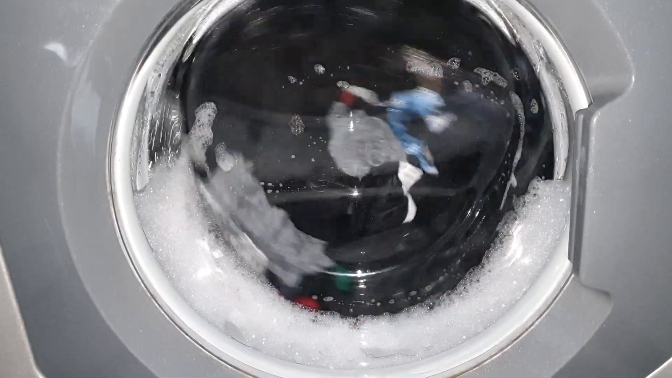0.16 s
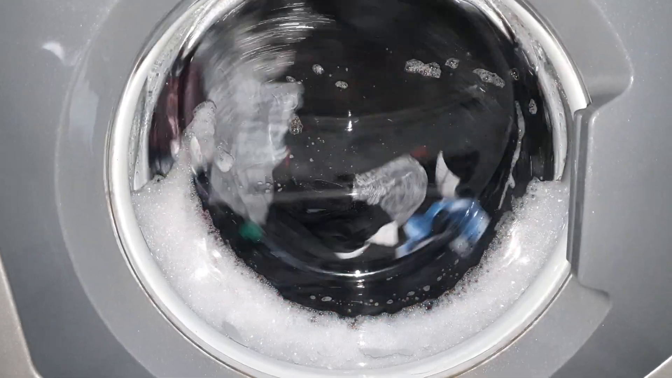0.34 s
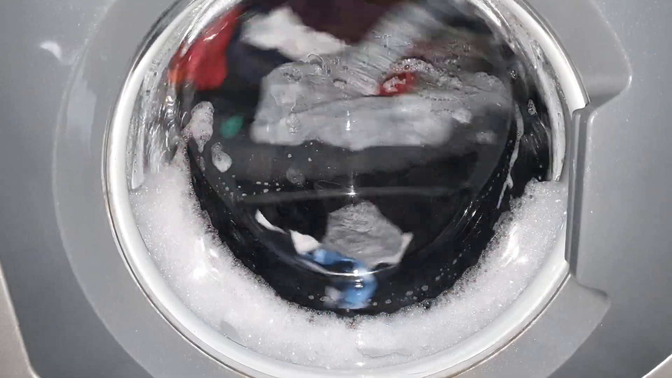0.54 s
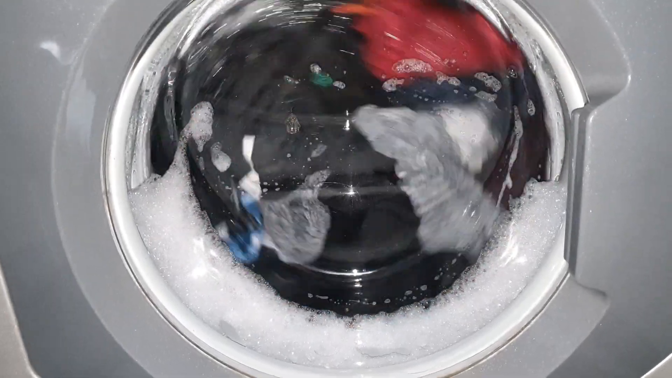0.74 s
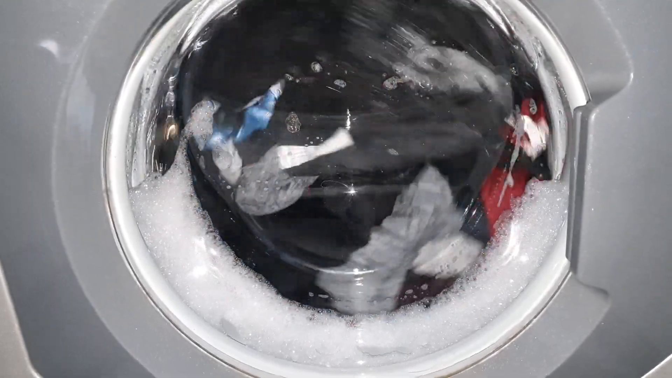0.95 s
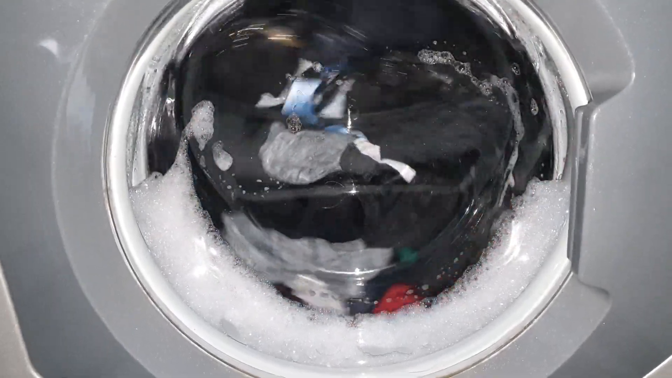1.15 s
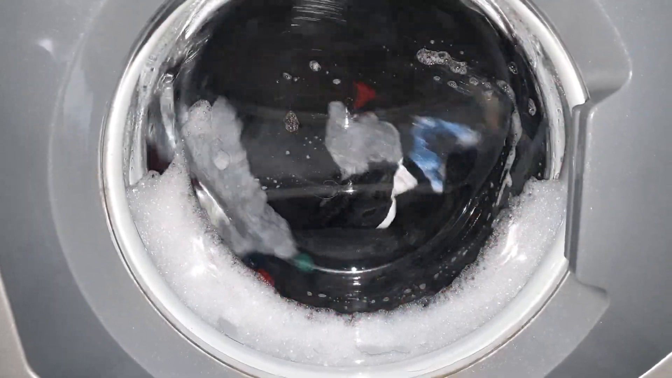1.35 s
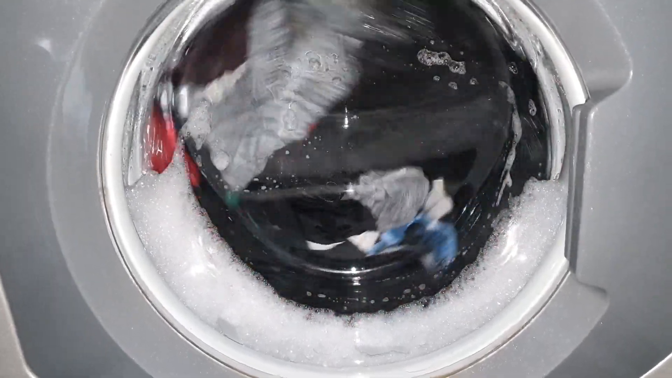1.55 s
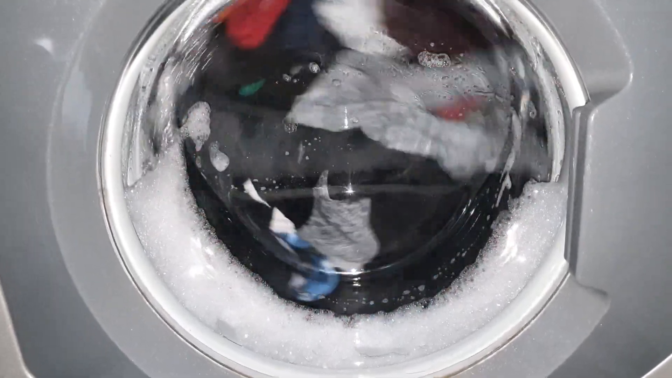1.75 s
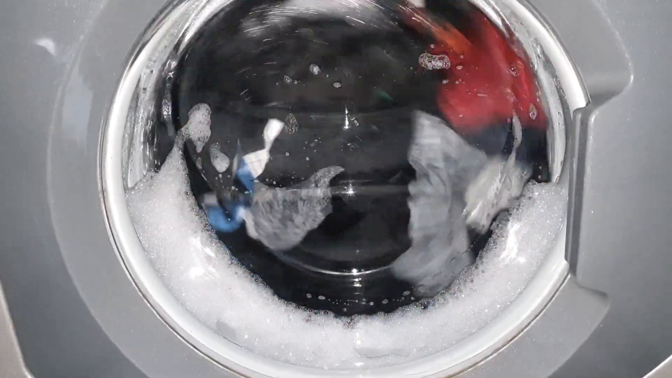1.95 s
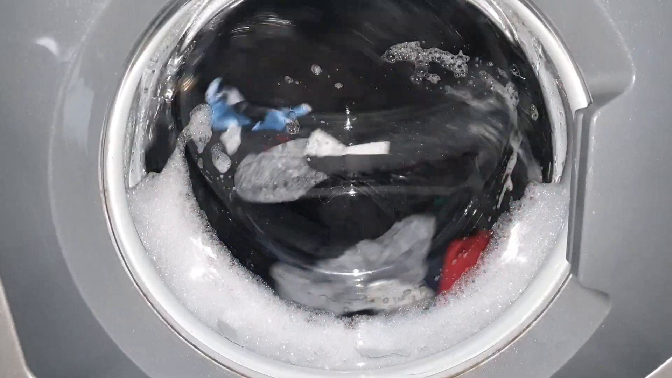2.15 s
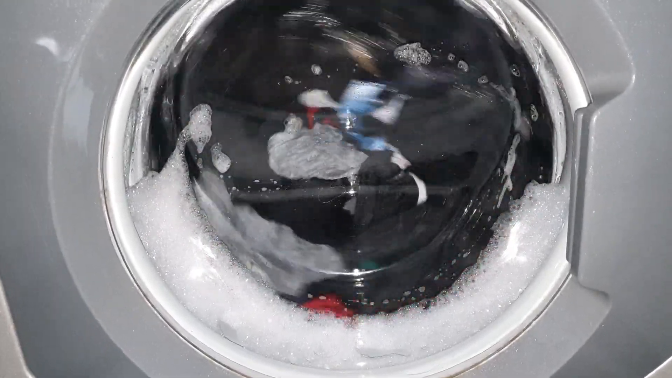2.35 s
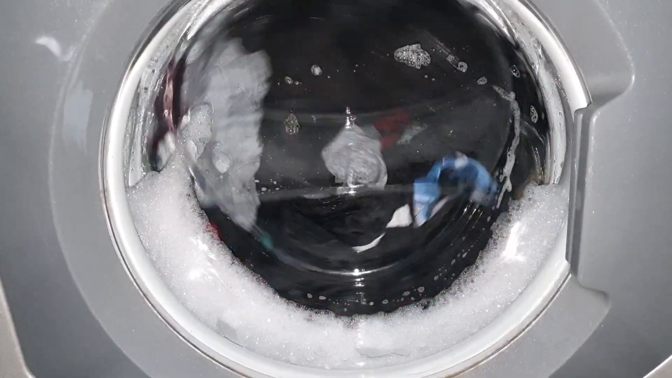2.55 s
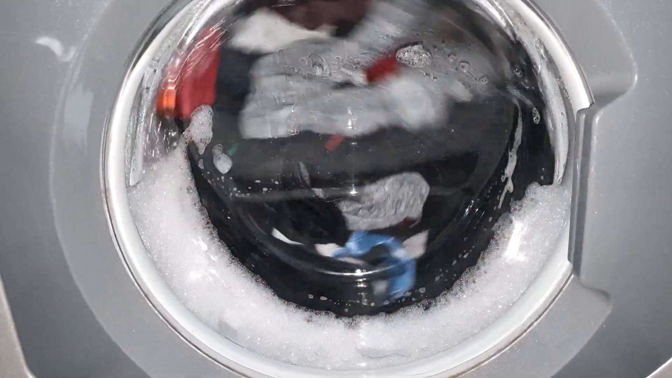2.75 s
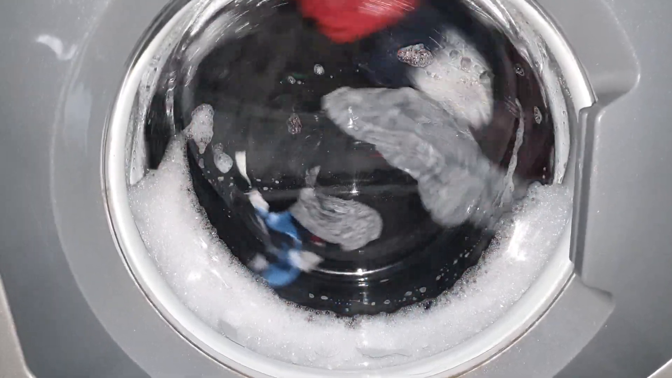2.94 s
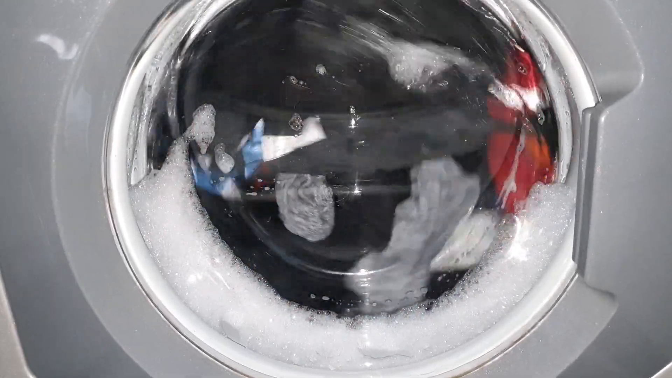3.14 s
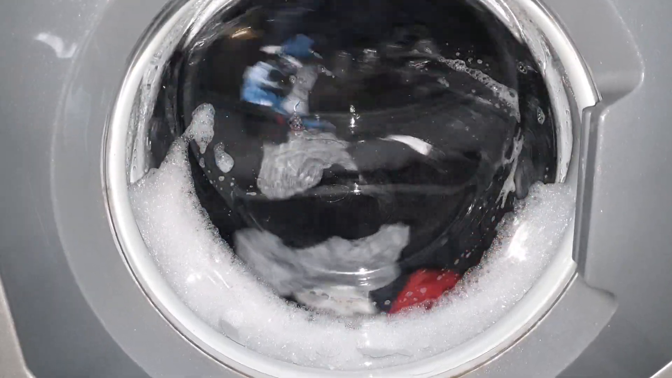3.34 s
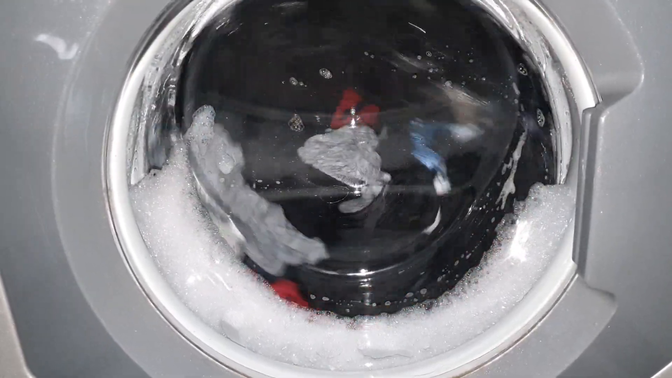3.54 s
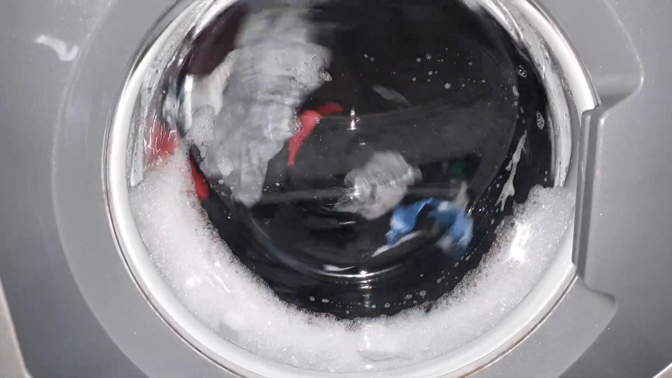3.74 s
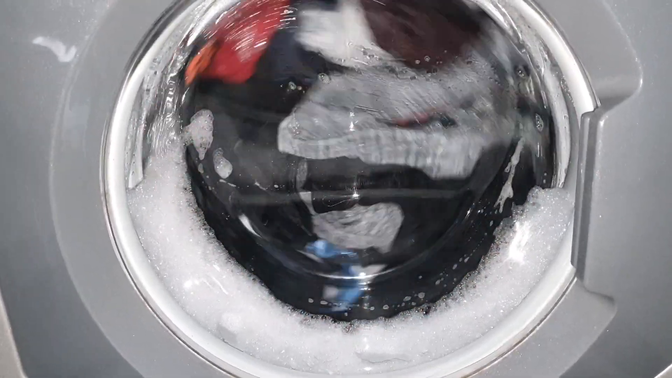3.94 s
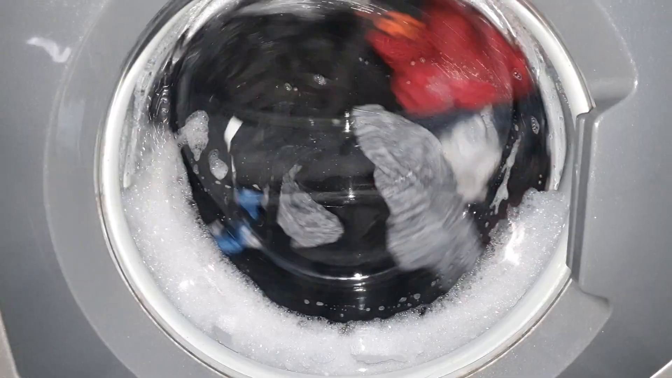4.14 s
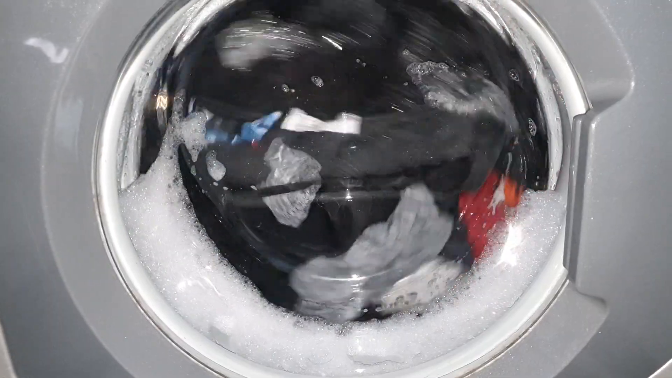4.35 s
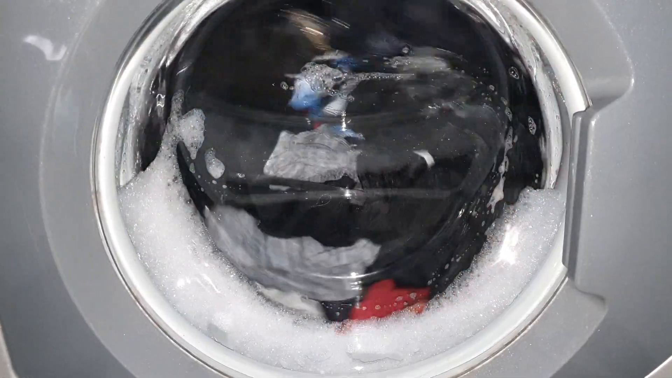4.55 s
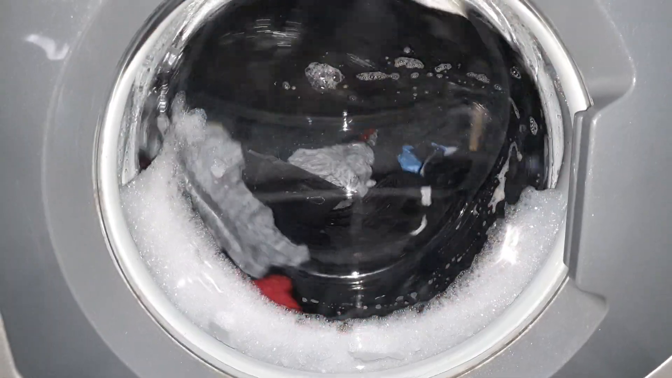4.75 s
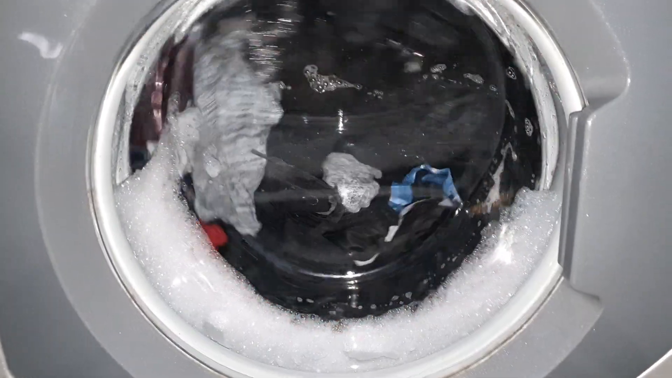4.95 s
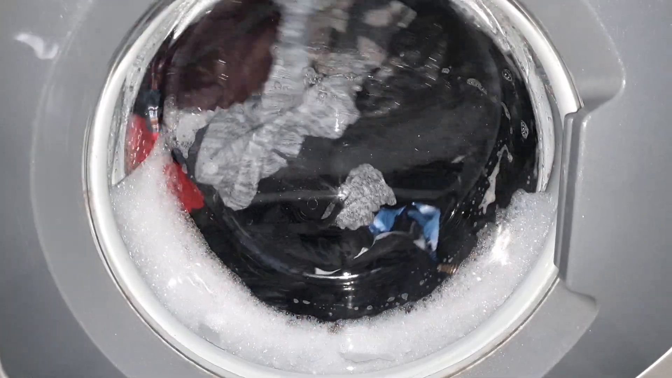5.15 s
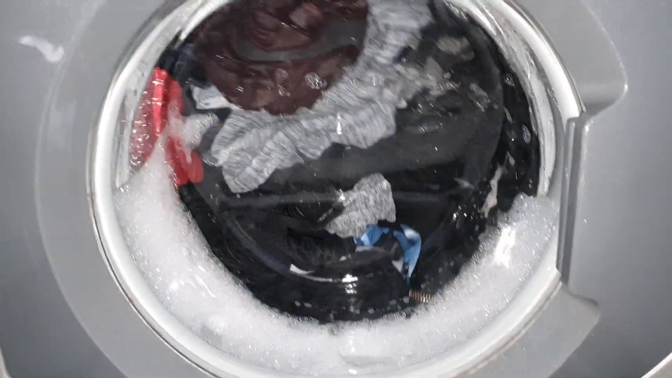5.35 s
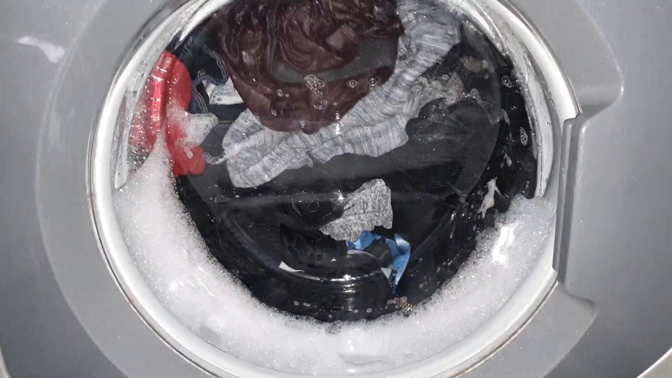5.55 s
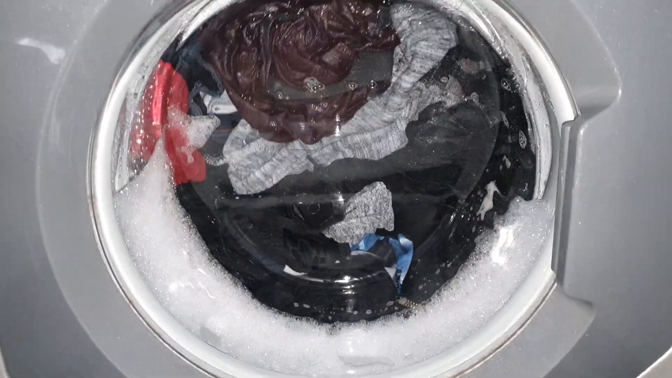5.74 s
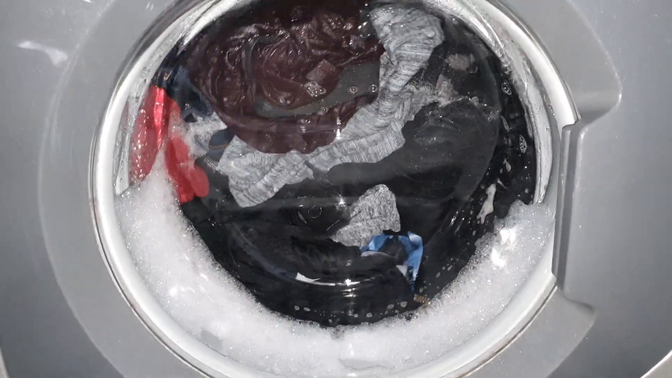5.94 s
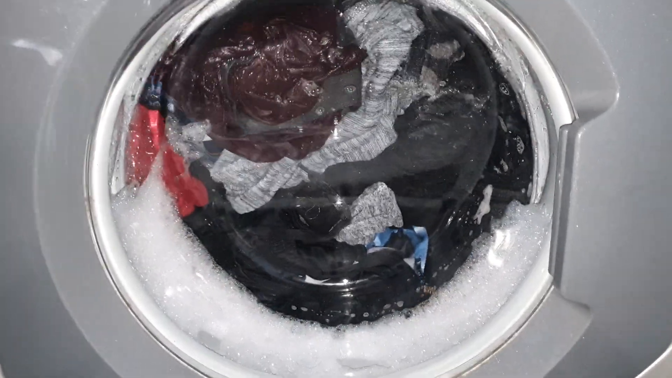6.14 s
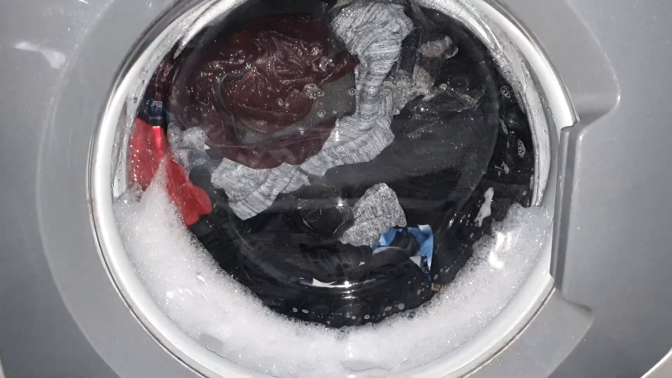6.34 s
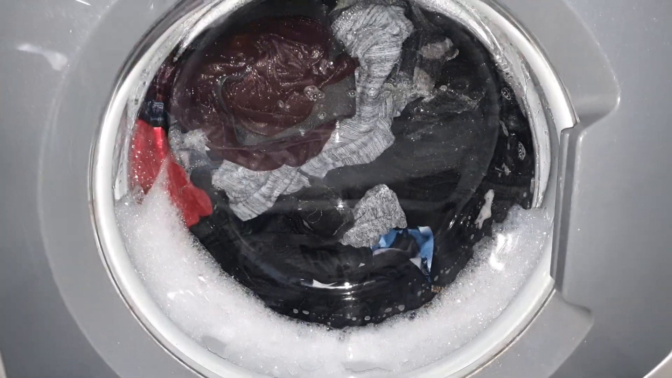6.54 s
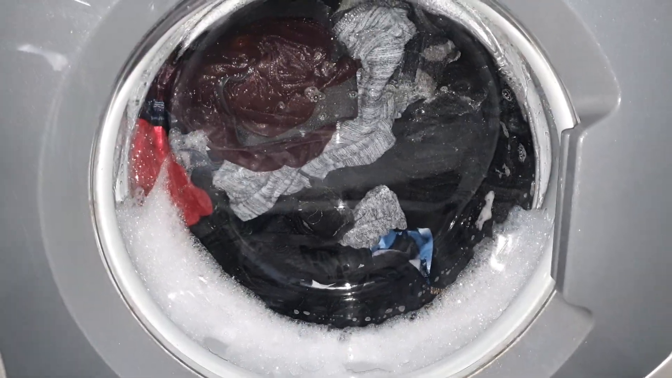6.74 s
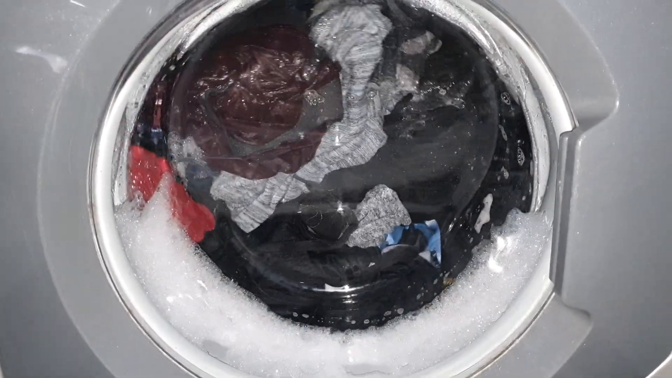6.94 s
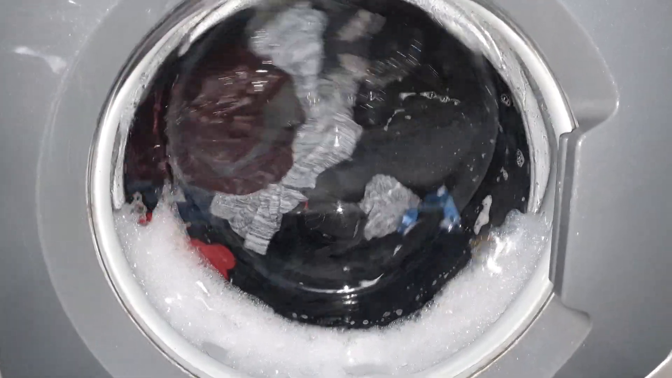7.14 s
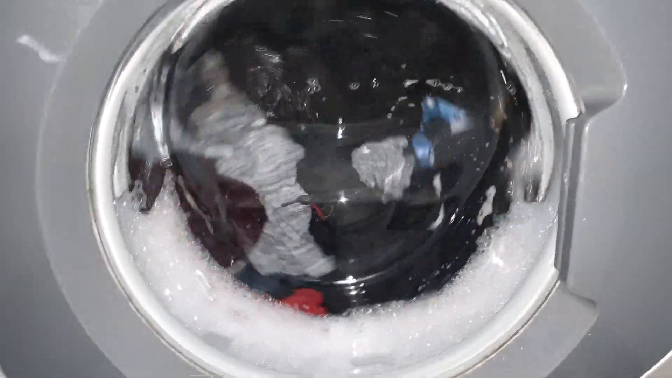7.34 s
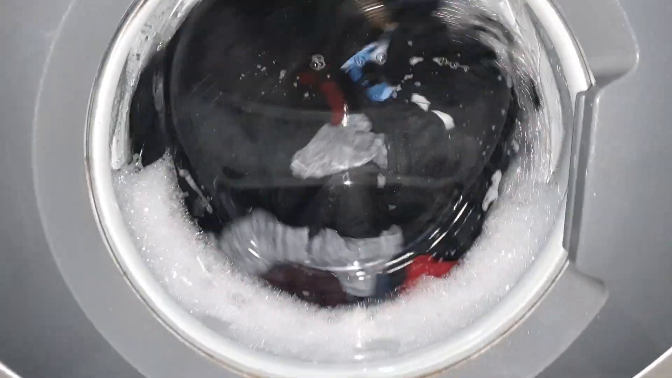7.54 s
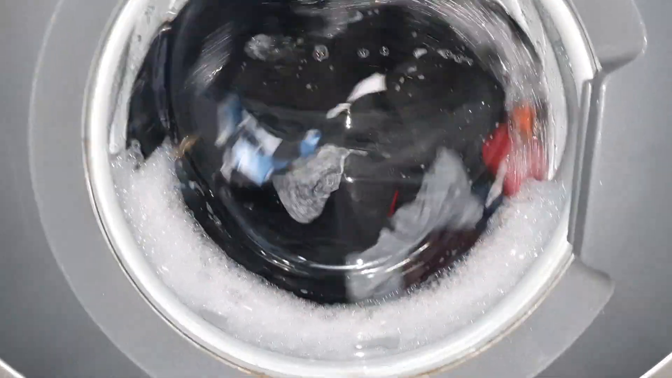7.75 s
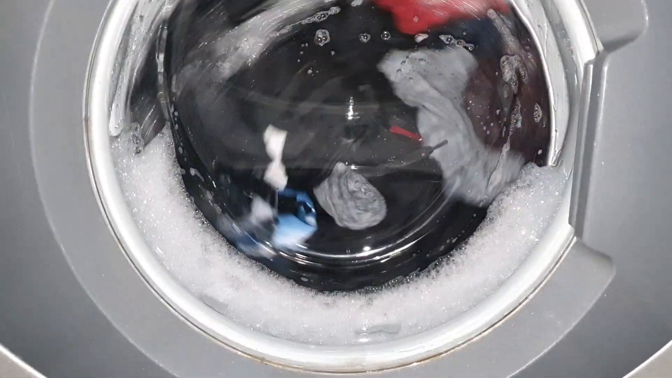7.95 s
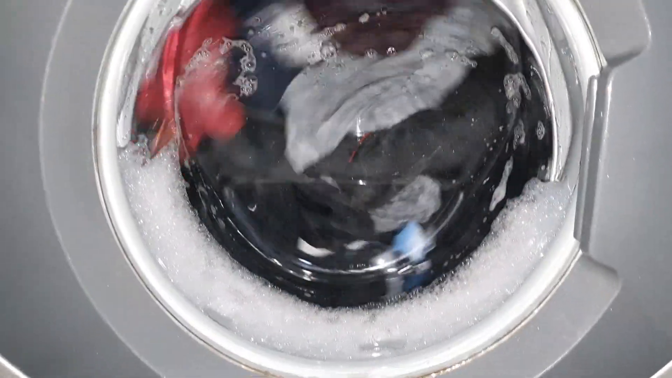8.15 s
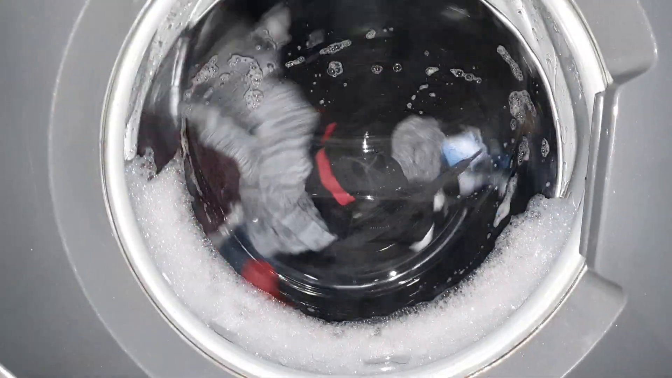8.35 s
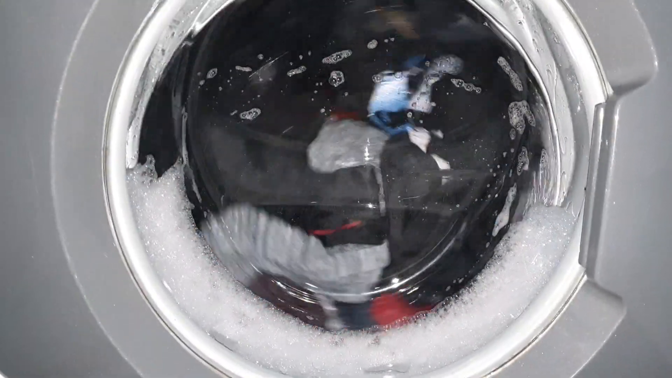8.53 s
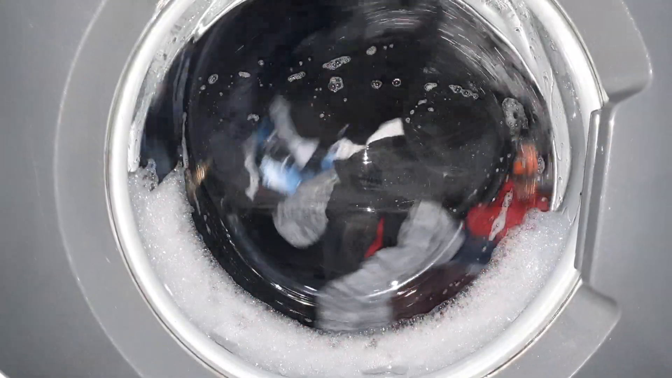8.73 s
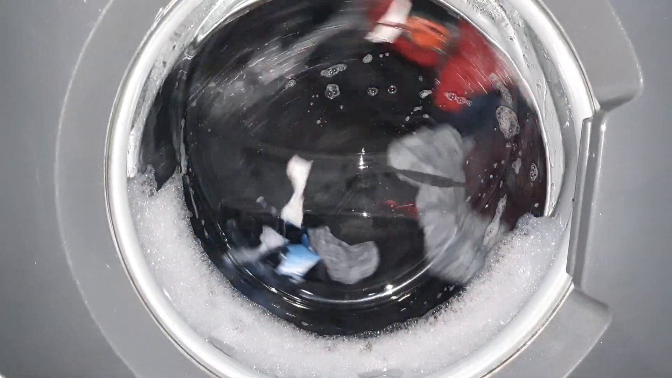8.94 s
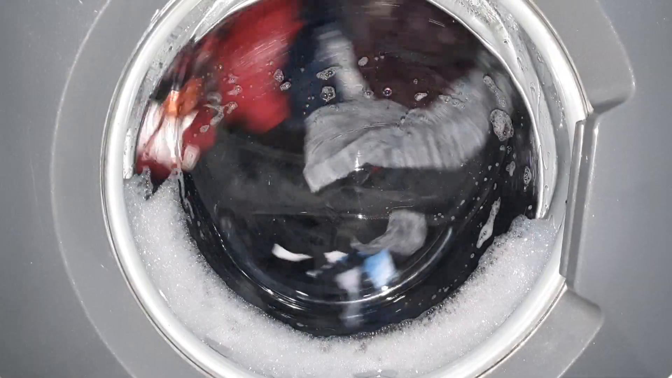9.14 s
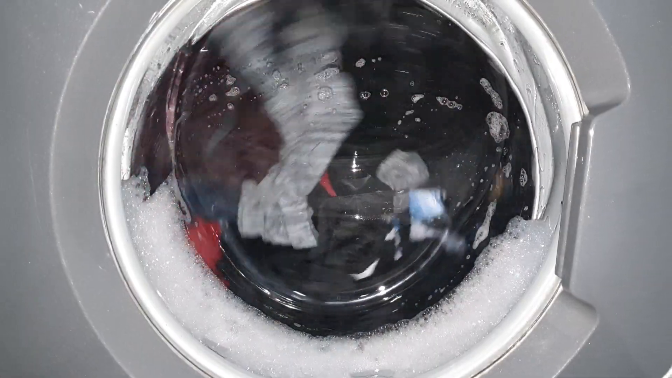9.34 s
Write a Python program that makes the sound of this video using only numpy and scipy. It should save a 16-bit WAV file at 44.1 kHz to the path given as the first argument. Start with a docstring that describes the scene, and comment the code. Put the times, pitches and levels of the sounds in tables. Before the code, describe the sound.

A washing machine drum tumbles soaked laundry with slaps, sloshing and small clicks, pauses on a pulsing mains hum, then jolts back into motion.

```python
"""Wet laundry slaps and thumps in a front-loading washing machine, heard near its door in a small room.
Slaps are noise bursts with droplet grains; thumps, churning water and suds are coloured noise; the drum's
jolts and the ticks of buttons or the machine itself ring modes. Two close sines make the slowly beating hum.
The drum stops near 4.5 s, the suds settle, and around two jolts the motor starts it the other way near 7 s."""
import sys
import numpy as np
from scipy import signal
from scipy.fft import rfft, irfft, next_fast_len
from scipy.io import wavfile
from scipy.ndimage import uniform_filter1d

SR = 44100
rng = np.random.default_rng(int(sys.argv[2]) if len(sys.argv) > 2 else 0)


def store_wav(level_fs):
    """Save 16-bit WAV to argv[1]."""
    pcm = np.round(np.clip(np.atleast_2d(level_fs), -1, 1) * 32767)
    wavfile.write(sys.argv[1], SR, pcm.T.astype(np.int16))


N = 414099
TIME = np.arange(N) / SR

# wet cloth falling in the drum; the faint hit at 3.692 may be a tick on the door:
# start_s, slap_db (nominal peak), thump_db (peak)
FALLS = [(.125, -45.5, -44), (.448, -45, -42.5), (.776, -48.5, -60), (1.261, -47, -50),
         (1.659, -53.5, -46.5), (1.845, -55, -37), (1.992, -54, -52), (2.152, -43.5, -39.5),
         (2.482, -43, -34.5), (2.931, -43, -31), (3.057, -51, -44.5), (3.287, -42.5, -33.5),
         (3.348, -48, -71), (3.692, -53, -64), (4.090, -42.5, -29.5), (4.255, -55, -39), (4.403, -54, -40),
         (4.430, -49, -51), (4.825, -56, -38), (7.335, -55.5, -47), (7.582, -41.5, -59),
         (7.775, -44.5, -40.5), (7.815, -55.5, -52), (7.958, -44, -39), (8.06, -49.5, -52),
         (8.628, -46.5, -35), (9.113, -53.5, -56), (9.258, -61, -49), (9.335, -55, -55)]
# one run of the drum each way: power_on_s, power_off_s
POWER = [(-2, 4.48), (6.95, 10)]
# level of each run: brush_db (relative), rumble_db, churn_db, suds_db (before the swish)
RUNS = [(-4, -62.5, -57.5, -73), (-10, -62, -56.5, -70)]
SPIN_UP_S, COAST_S = 0.15, 0.23  # linear rise, exponential fade
BREAK_LOOSE_S, LOOSEN_S = 0.315, 0.06  # the drum turns a little before the load gives way


def slaps(hard_rise_s=0.000099, hard_db=-42, hold_s=0.0048, smack_t60_s=0.18,
          wash_rise_s=0.014, wash_t60_s=0.35, wash_db=-6, crest_db=20.5):
    """Wet cloth hits with a smack of droplets, then a duller wash; light falls land more softly."""
    # spray: freq_hz, level_db
    spray_colour = [(300, -12.5), (1100, 7), (1580, -3), (2050, 4.5), (3150, 4.8), (3800, -1.5), (4700, -5),
                    (6700, -6.5), (7500, -12.5), (10000, -9.5), (16000, -24)]
    out, t = np.zeros((2, N)), np.arange(SR // 2) / SR
    for start_s, db, _ in FALLS:
        rise_s = hard_rise_s * undb(hard_db - db)
        smack = 1.1 * (grains(len(t), 3000, scatter_db=2.1) + noise(len(t)))
        smack *= (1 - np.exp(-t / rise_s)) * undb(-60 * np.maximum(t - hold_s, 0) / smack_t60_s)
        wash_rise = 1 - np.exp(-t / wash_rise_s)
        wash = colour(noise(len(t)), [(3000, 10.0), (4500, -2.0), (8000, 2.5)])
        wash *= wash_rise * undb(wash_db - 60 * t / wash_t60_s)
        ragged = undb(2.7 * walk(95)[:len(t)] * wash_rise)  # the water runs off in spurts
        slap = unit(spread(colour((smack + wash) * ragged, spray_colour)))
        add(out, start_s, slap * undb(db - crest_db))
    return cavity(out)


def thumps(lag_s=0.015, swell_s=0.02, tail_s=0.097):
    """The bundle's weight lands after its wet edge: a swelling noise burst that booms in the tub."""
    # tub: freq_hz, level_db
    tub_colour = [(60, -19.5), (210, -11.5), (255, -0.5), (285, 1), (315, -12), (345, -4.5), (420, -24.5),
                  (600, -23.5), (8000, -75)]
    out, t = np.zeros((2, N)), np.arange(SR // 2) / SR
    for start_s, _, db in FALLS:
        envelope = t / swell_s * np.exp(-t / swell_s) + 0.2 * np.exp(-t / tail_s)
        blow = spread(colour(noise(len(t)) * envelope, tub_colour))
        add(out, start_s + lag_s, peak(blow, db))
    return from_right(out)


def water(surge_db=5, surge_s=1, swish_db=2.6, gurgle_db=-71.5):
    """Water churns, gurgles low behind the door, and the suds swish; each fall stirs them up."""
    # churning water: freq_hz, level_db
    churn_colour = [(25, -7.5), (175, -2), (205, -6.5), (280, 4), (420, -8.5), (560, -3), (760, -12),
                    (1130, -16), (1500, -35.5), (8000, -68.5)]
    # suds: freq_hz, level_db
    suds_colour = [(600, -8), (1100, 1), (1500, -3), (2800, 1), (3900, -4), (6800, -11), (7500, -21),
                   (9600, -16), (11500, -25), (16000, -31)]
    # gurgle: freq_hz, level_db
    gurgle_colour = [(500, -12), (1100, 0), (2200, -7), (4500, -26)]
    churn = unit(spread(colour(noise(), churn_colour))) * undb(2 * walk(22))
    fizz = noise() + 1.8 * splashes() * grains(N, 4000, scatter_db=2)
    foam = unit(cavity(spread(colour(fizz, suds_colour))))
    lapping = noise() * splashes(rate=11)  # small waves slap the drum
    gurgle = unit(cavity(spread(colour(lapping, gurgle_colour)))) * undb(gurgle_db)
    out, swish = 0, walk(16)
    for (on_s, off_s), (_, _, churn_db, suds_db) in zip(POWER, RUNS):
        # the first turn drags the soaked load through the suds: louder and more even
        drag = np.exp(-np.maximum(TIME - on_s - BREAK_LOOSE_S, 0) / surge_s)
        suds = foam * undb(suds_db + surge_db * drag + swish_db * swish * (1 - drag))
        out = out + stirring(on_s, off_s) * (churn * undb(churn_db) + gurgle + suds)
    return out


def strokes(rise_s=0.0022, fade_s=0.037):
    """A fold of sudsy cloth wipes the foam on the door glass: a short, bright fizz."""
    # wipes: start_s, level_db (rms before the envelope)
    wipes = [(0.299, -70), (1.452, -71), (1.815, -69.5), (1.965, -65.5), (2.629, -69), (3.101, -64.5),
             (3.133, -68), (3.91, -68), (7.275, -69), (7.924, -66)]
    # fizz: freq_hz, level_db
    stroke_colour = [(2000, -19), (5000, -1), (6700, 3), (7500, -1), (10000, 0.5), (14500, -22)]
    out, t = np.zeros((2, N)), np.arange(SR // 5) / SR
    for start_s, db in wipes:
        droplets = noise(len(t)) + 0.82 * grains(len(t), 3000, scatter_db=3)
        fizz = unit(colour(droplets, stroke_colour))
        add(out, start_s, fizz * (1 - np.exp(-t / rise_s)) * np.exp(-t / fade_s) * undb(db))
    return cavity(out)


def gulps(count=60, length_s=0.045, scatter=0.24, fade_s=0.0016, rise_per_s=3):
    """Air gulps out from under the cloth as a froth of short-lived bubbles, each rising in pitch."""
    # air pockets: start_s, level_db (nominal peak), pitch_hz
    pockets = [(.915, -54, 1010), (1.124, -49, 1180), (2.255, -50, 1030), (3.06, -49, 1050),
               (4.257, -45.5, 1080), (4.404, -42.5, 940), (7.333, -47, 1090), (7.96, -44, 910)]
    out, t = np.zeros((2, N)), np.arange(SR // 20) / SR
    for start_s, db, hz in pockets:
        froth = np.zeros((2, SR // 2))
        for _ in range(count):
            bubble_hz = hz * np.exp(scatter * rng.standard_normal())
            phase = 2 * np.pi * bubble_hz * t * (1 + rise_per_s * t / 2) + rng.random((2, 1))
            ping = np.sin(phase) * np.exp(-t / fade_s)
            add(froth, length_s * rng.random(), ping * rng.random())
        add(out, start_s, peak(froth, db + 0.5))
    return cavity(out * undb([[2], [-2]]))


def squelch():
    """The settling load squeezes air through the foam: a swelling hiss, pitched by its escape gap."""
    # squeezes: crest_s, level_db, hiss_db, gap_hz, gap_t60_s, swell_s, fade_s
    squeezes = [(4.458, -56.5, -11, 4140, 0.0029, 0.0064, 0.072),
                (5.404, -57.5, 1, 3500, 0.011, 0.04, 0.011)]
    # hiss: freq_hz, level_db
    hiss_colour = [(1300, -3), (2800, -18), (4500, -15), (7500, -14), (12500, -10), (14500, -35)]
    out, hiss = 0, unit(colour(noise(), hiss_colour))
    for crest_s, db, hiss_db, gap_hz, gap_t60_s, swell_s, fade_s in squeezes:
        gap = unit(resonate(noise(), [(gap_hz, 0, gap_t60_s)]))
        envelope = np.exp(-np.maximum((crest_s - TIME) / swell_s, (TIME - crest_s) / fade_s))
        out = out + unit(gap + hiss * undb(hiss_db)) * undb(db) * envelope
    return out


def jolts(grate_s=0.031, chatter=0.064, judder=0.018, judder_wander=0.071, focus_db=9,
          bounce_s=0.039, bounce=0.42):
    """The jolted drum judders, grates and bounces once; each contact rings its modes."""
    # jolts, the place struck favouring a pitch: start_s, peak_db, favoured_hz
    knocks = [(.785, -41.5, 560), (3.185, -41, 559), (4.455, -32, 645), (6.703, -40.5, 686),
              (7.010, -34.5, 678), (8.183, -36, 532)]
    # drum modes: freq_hz, level_db, t60_s
    drum = [(375, -1, 0.08), (465, -3, 0.06), (574, -4, 0.06), (655, -5, 0.075), (690, -6, 0.09),
            (830, -11, 0.05), (1206, -10, 0.045), (1720, -9.5, 0.05), (2450, -13, 0.035)]
    body_colour = [(200, -5), (480, 2.5), (1750, 0), (2500, -6), (3600, -28)]
    out, t = np.zeros((2, N)), np.arange(SR // 3) / SR
    for start_s, db, favoured_hz in knocks:
        for lag_s, size in [(0, 1), (bounce_s, bounce)]:
            wander = judder_wander * np.cumsum(rng.standard_normal(len(t)))
            slipping = np.sin(2 * np.pi * favoured_hz * t + wander)
            push = chatter * rng.standard_normal(len(t)) + judder * slipping
            push *= np.exp(-(t / grate_s) ** 2)
            push[0] += 1  # the contact itself
            knock = resonate(push[None], modes_struck(drum, favoured_hz, focus_db))
            add(out, start_s + lag_s, size * peak(colour(knock, body_colour), db))
    return out


def ticks(crack_s=0.0041, tail_db=-21, tail_t60_s=0.64, scatter_db=2, focus_db=8, pan_db=5):
    """A button, zip or the machine itself clicks or knocks: a crack, ringing modes and a short room tail."""
    # hits; 6.629 is a faint dull knock while the drum rests, perhaps a relay:
    # start_s, peak_db, hardness_db (treble), ring_db, favoured_hz
    hits = [(0.1862, -38.5, -9, -11, 3200), (0.245, -42.5, 7, -12, 4300), (0.89, -37, -5, -9, 3370),
            (0.932, -45, -24, -15, 3700), (1.386, -49, -1, -16, 3300), (2.0737, -42, -11, -19, 2000),
            (3.6073, -42, 15, -2, 5960), (4.7273, -46, 10, -9, 3270), (6.629, -62, -36, -25, 1820),
            (7.997, -39, 3, -13, 2900), (8.7282, -33, 16.5, -15, 8400), (8.81, -41.5, -10, -19, 1800)]
    # door modes: freq_hz, level_db, t60_s
    door = [(1810, 2, 0.18), (3130, 6.5, 0.029), (3380, 9.5, 0.055), (4350, 7, 0.037), (6340, 2, 0.028),
            (8320, 0.5, 0.04)]
    out, t = np.zeros((2, N)), np.arange(SR // 4) / SR
    for start_s, db, hard_db, ring_db, favoured_hz in hits:
        crack = noise(len(t)) * (np.exp(-t / crack_s) + undb(tail_db - 60 * t / tail_t60_s))
        modes = []
        for hz, mode_db, t60_s in modes_struck(door, favoured_hz, focus_db):
            detune = 1 + 0.0081 * rng.standard_normal()
            modes.append((hz * detune, mode_db + scatter_db * rng.standard_normal(), t60_s))
        hardness = [(500, 8.0), (2500, 0.84), (6000, 4.5 + min(hard_db, 0) / 2), (13000, hard_db - 7.5)]
        tick = colour(crack + undb(ring_db) * ring(modes, t), hardness)
        add(out, start_s, peak(tick * undb([[pan_db / 2], [-pan_db / 2]]), db))
    return out


def bumps(hz=82, swell_s=0.018):
    """The sprung tub bumps its dampers and the cabinet answers with a short, deep boom."""
    # bumps: start_s, level_db (nominal)
    swings = [(0.868, -34.5), (3.038, -27.5), (4.127, -31), (7.995, -33), (8.126, -33), (8.724, -33),
              (8.967, -33)]
    out, t = np.zeros((2, N)), np.arange(SR // 4) / SR
    for start_s, db in swings:
        boom = np.sin(2 * np.pi * hz * (1 + 0.084 * rng.standard_normal()) * t)
        add(out, start_s, boom * t / swell_s * np.exp(1 - t / swell_s) * undb(db - 5.0))
    return out


def rocking(rest_db=-57.5, stirred_db=-56.5):
    """The tub rocks on its springs: deep noise, stronger while the water is stirred."""
    # rocking: freq_hz, level_db
    rock_colour = [(20, -50), (48, 8.5), (82, 14.5), (105, 15.5), (140, -1), (220, -42)]
    motion = sum(stirring(on_s, off_s) for on_s, off_s in POWER)
    return unit(spread(colour(noise(), rock_colour))) * np.hypot(undb(rest_db), motion * undb(stirred_db))


def motor():
    """The motor whines and the drum rumbles on its bearing; extra tones sound in the first run only."""
    # whine: time_s, pitch_hz, level_db (rms)
    whine_track = [(0, 664, -65), (4.5, 671, -69), (7.1, 660, -63), (7.55, 656, -71), (7.97, 693, -63),
                   (8.35, 694, -72), (8.6, 692, -58.5), (9.39, 669, -60)]
    # forward tones: freq_hz, level_db (rms)
    motor_tones = [(2020, -82.5), (2145, -84.5), (2445, -82)]
    # bearing rumble: freq_hz, level_db
    rumble_colour = [(250, -26.5), (470, -0.5), (520, -3), (625, 3), (680, 10), (730, -10), (1150, -16.5),
                     (1600, -37), (6000, -84.5)]
    rumble = unit(spread(colour(noise(), rumble_colour))) * undb(0.66 * walk(24))
    tones = sum(tone(hz + 4 * walk(30)) * undb(db + 0.47 * walk(12)) for hz, db in motor_tones)
    point_s, point_hz, point_db = np.transpose(whine_track)
    whine = tone(np.interp(TIME, point_s, point_hz) + 6 * walk(60))
    whine = whine * undb(np.interp(TIME, point_s, point_db) + 1.6 * walk(6.6))
    out = tones * running(*POWER[0], SPIN_UP_S, COAST_S)
    for (on_s, off_s), (_, rumble_db, _, _) in zip(POWER, RUNS):
        speed = running(on_s, off_s, SPIN_UP_S, COAST_S)
        out = out + speed * from_right(whine + rumble * undb(rumble_db))
    return out


def brushes(base_db=-71.0, fade_s=0.86):
    """The motor's brushes hiss, and hiss on while it coasts; quieter backwards."""
    # brush hiss: freq_hz, level_db
    brush_colour = [(2200, -6), (2500, -2), (3000, -5), (6800, -8), (7400, -20), (8300, -9), (9700, -7),
                    (10800, -19)]
    hiss = unit(cavity(spread(colour(noise(), brush_colour)))) * undb(base_db + 1.3 * walk(21))
    return sum(running(on_s, off_s, SPIN_UP_S, fade_s) * hiss * undb(brush_db)
               for (on_s, off_s), (brush_db, _, _, _) in zip(POWER, RUNS))


def drum_wall(level_db=-74, waver_db=1.6):
    """The load sliding over the drum's thin steel wall keeps its modes singing."""
    # wall modes: freq_hz, level_db, t60_s
    wall_modes = [(1734, -4.5, 0.098), (2477, 3.5, 0.04), (4390, 1, 0.029), (4770, -2, 0.033),
                  (5460, -2.5, 0.03)]
    singing = unit(sum(resonate(noise(), [mode]) * undb(waver_db * walk(15)) for mode in wall_modes))
    sliding = sum(running(on_s + BREAK_LOOSE_S, off_s, LOOSEN_S, COAST_S) for on_s, off_s in POWER)
    return sliding * singing * undb(level_db) * undb([[2], [-2]])


def inverter(pitch_hz=15732, hiss_db=-85, tone_db=-94, fade_s=0.032):
    """The powered inverter gives a narrow, high hiss and an unsteady tone."""
    # hiss: freq_hz, level_db
    inverter_colour = [(1000, -54), (14200, -27), (14700, -10), (15750, -7), (16000, -34)]
    hiss = unit(spread(colour(noise(), inverter_colour))) * undb(hiss_db)
    whistle = tone(pitch_hz + 7 * walk(50)) * undb(tone_db + 3 * walk(10))
    powered = sum(running(on_s, off_s, SPIN_UP_S, fade_s) for on_s, off_s in POWER)
    return powered * (hiss + whistle)


def hum(mains_hz=99.88, beat_s=0.812, crest_s=4.94, mains_db=-46.5, pump_db=-57):
    """A mains tone beats with a source just under it, probably the pump; steady tones lie on top."""
    # machine tones: freq_hz, level_db (mean)
    steady_tones = [(155.5, -61.5), (311, -69.5), (986, -73.5)]
    mains_phase = 2 * np.pi * mains_hz * TIME
    slip = 2 * np.pi * (TIME - crest_s) / beat_s
    mains = undb(mains_db) * np.sin(mains_phase)
    pump = undb(pump_db) * np.sin(mains_phase - slip)
    tones = sum(tone(hz + 1.574 * walk(14)) * undb(db + walk(11)) for hz, db in steady_tones)
    return (np.sqrt(2) * (mains + pump) + tones) * undb([[-.25], [.25]])


def background(whirr_db=-77.5, air_db=-56.5):
    """A steady whirr in two bands of noise, and the still air of the room."""
    # still air: freq_hz, level_db
    still_colour = [(88, -28.5), (150, 1.5), (213, -9.5), (314, -9), (366, -17), (519, -15), (844, -35.5),
                    (966, -25.5), (1200, -46), (4000, -50), (15500, -96)]
    whirr_colour = [(600, -41.5), (920, -9.0), (1080, -7.5), (1600, -43.5),
                    (3500, -40.0), (3870, -23.0), (4400, -44.0)]
    whirr = unit(spread(colour(noise(), whirr_colour)))
    air = unit(spread(colour(noise(), still_colour)))
    return undb(whirr_db) * whirr + undb(air_db) * air


def running(start_s, stop_s, rise_s, fade_s):
    """Envelope that rises from start, holds, and dies away after stop."""
    return np.clip((TIME - start_s) / rise_s, 0, 1) * np.exp(-np.maximum(TIME - stop_s, 0) / fade_s)


def stirring(on_s, off_s, settle_s=0.57):
    """Motion of the water in one run: starts as the load breaks loose, comes to rest slowly."""
    return running(on_s + BREAK_LOOSE_S, off_s, LOOSEN_S, settle_s) * slosh()


def slosh(gain_db=47.5, fade_s=0.14):
    """How far the falls have stirred up the water: each adds a wave that dies away."""
    kicks = np.zeros(N)
    for start_s, slap_db, _ in FALLS:
        kicks[int(start_s * SR)] = undb(slap_db + gain_db)
    return 1 + signal.lfilter([1], [1, -np.exp(-1 / (fade_s * SR))], kicks) / 2


def splashes(rate=14, fade_s=0.031, rise_s=0.00068):
    """Envelope of small splashes at random moments (rate per s), swelling quickly and dying away."""
    chance = rng.random((N, 2)).T
    t = np.arange(SR // 3) / SR
    splash = (1 - np.exp(-t / rise_s)) * np.exp(-t / fade_s)
    return signal.fftconvolve((chance[0] < rate / SR) * chance[1], splash)[:N]


def grains(size, rate, scatter_db):
    """Tiny droplet and bubble bursts (rate per s), a few much larger than the rest."""
    chance = rng.random((size, 2)).T
    sizes = undb(scatter_db * np.minimum(-np.log(1 - chance[1]), 5))
    return unit(noise(size) * (chance[0] < rate / SR) * sizes)


def cavity(pair, t60_s=0.09, echo_db=-6):
    """Dense reflections between drum and door glass colour the upper range."""
    t = np.arange(SR // 8) / SR
    echoes = colour(noise(len(t)) * undb(-60 * t / t60_s), [(400, -24.5), (1200, -4.0)])
    echoes *= undb(echo_db) / np.linalg.norm(echoes[0])
    return pair + signal.fftconvolve(pair, echoes, axes=1)[:, :N]


def from_right(pair, lag_s=0.00014):
    """The tub radiates from the right, so its sound reaches the left side later."""
    return np.array([np.interp(TIME - lag_s, TIME, pair[0]), pair[1]])


def modes_struck(modes, favoured_hz, focus_db):
    """A blow rings most the modes near its favoured pitch."""
    return [(hz, db - focus_db * np.sqrt(abs(np.log2(hz / favoured_hz))), t60_s) for hz, db, t60_s in modes]


def ring(modes, t):
    """Impulse response of a set of modes; higher ones reach the two sides in different phase."""
    out = 0
    for hz, db, t60_s in modes:
        phase = min(hz / 1800, .8) * rng.standard_normal((2, 1))
        out = out + undb(db - 60 * t / t60_s) * np.sin(2 * np.pi * hz * t + phase)
    return out


def resonate(pair, modes):
    """Drive a set of modes with a force."""
    return signal.fftconvolve(pair, ring(modes, np.arange(SR // 4) / SR), axes=1)[:, :pair.shape[1]]


def spread(pair):
    """Two unrelated signals to stereo: shared bass, diffuse treble that leans left."""
    # width: freq_hz, side_minus_mid_db
    width = [(60, -22.5), (200, -15.5), (380, -8.5), (700, -6.5), (1200, 3), (15000, -1.5)]
    # lean: freq_hz, left_minus_right_db
    lean = [(700, 1.23), (1290, 8.8), (2400, 6.7), (4400, 8.7), (8100, 1.2), (15000, 1)]
    mid, side = pair[0], colour(pair[1], width)
    return np.array([colour(mid + side, lean, 0.49), colour(mid - side, lean, -0.41)])


def colour(x, points, depth=1):
    """Causal minimum-phase filter with a spectrum of (Hz, dB) points."""
    size = 2 * next_fast_len(x.shape[-1] // 2 + 1, real=True)
    hz, db = np.transpose(points)
    freqs = np.maximum(np.arange(size // 2 + 1) * SR / size, 1)
    gain = undb(depth * np.interp(np.log(freqs), np.log(hz), db))
    cepstrum = irfft(np.log(gain))[:size // 2]
    response = np.exp(2 * rfft(cepstrum, size) - cepstrum[0])
    return irfft(rfft(x, size) * response, size)[..., :x.shape[-1]]


def noise(size=N):
    """Two channels of white noise."""
    return rng.standard_normal((size, 2)).T


def walk(rate):
    """Slow random wander of rms near 1, with rate new values per s."""
    hold = int(SR / rate)
    steps = np.repeat(rng.standard_normal(N // hold + 1), hold)
    return unit(uniform_filter1d(uniform_filter1d(steps, hold), hold)[:N])


def tone(hz):
    """A sine of rms 1 on a moving pitch."""
    return np.sqrt(2) * np.sin(2 * np.pi * np.cumsum(hz) / SR)


def undb(db):
    """Decibels to gain."""
    return 10 ** (np.asarray(db) / 20)


def unit(x):
    """Scale so that the centre of the stereo image has rms 1."""
    return x / np.std(np.atleast_2d(x).mean(axis=0))


def peak(x, db):
    """Scale the centre of the stereo image to a peak level."""
    return x * undb(db) / np.abs(x.mean(axis=0)).max()


def add(track, start_s, sound):
    """Mix a sound into the track."""
    start = max(int(start_s * SR), 0)
    track[..., start:start + sound.shape[-1]] += sound[..., :N - start]


def scene():
    """All parts of the machine together."""
    laundry = slaps() + thumps() + water() + strokes() + gulps() + squelch()
    knocks = jolts() + ticks() + bumps()
    drive = rocking() + motor() + brushes() + drum_wall() + inverter()
    return laundry + knocks + drive + hum() + background()


def record(dry):
    """The recorder cuts the top steeply above 15.9 kHz."""
    return signal.sosfilt(signal.ellip(10, .2, 70, 15900, fs=SR, output="sos"), dry)


dry = scene()
out = record(dry)
store_wav(out)
```